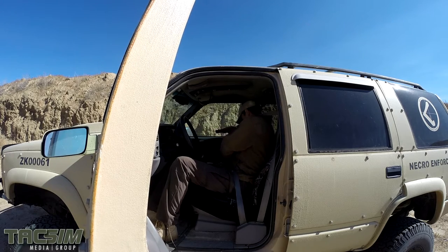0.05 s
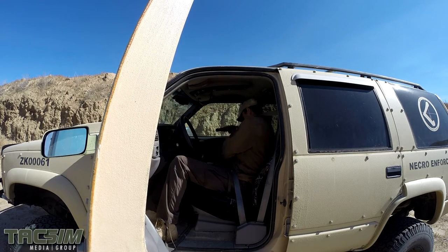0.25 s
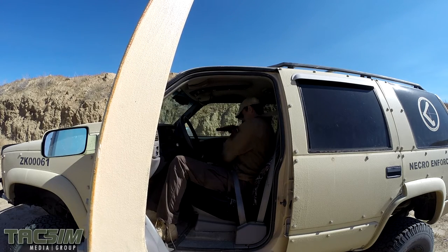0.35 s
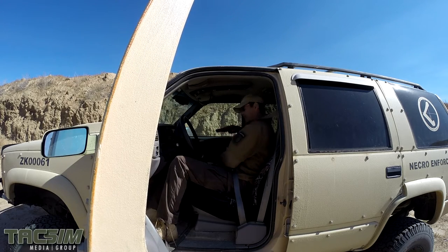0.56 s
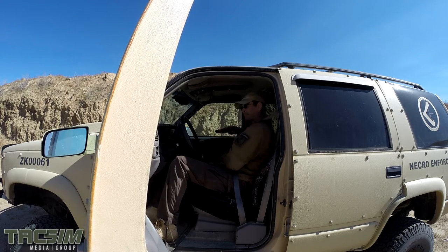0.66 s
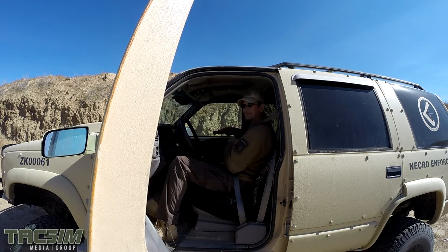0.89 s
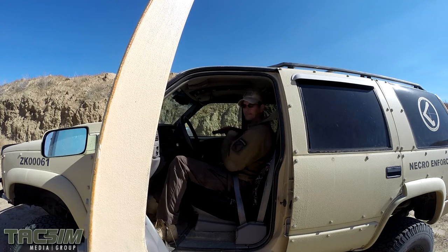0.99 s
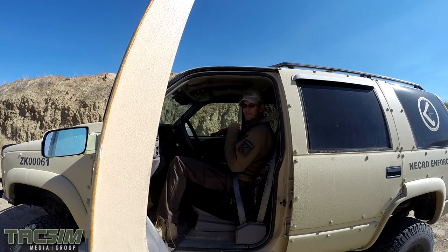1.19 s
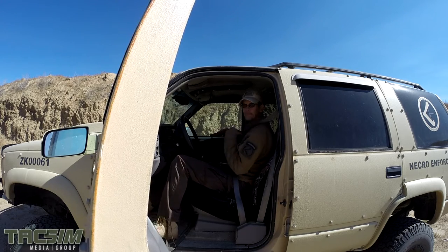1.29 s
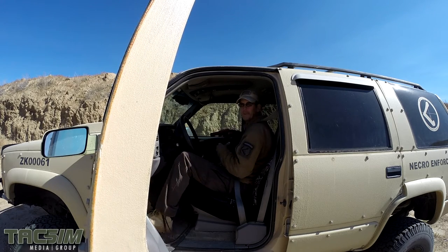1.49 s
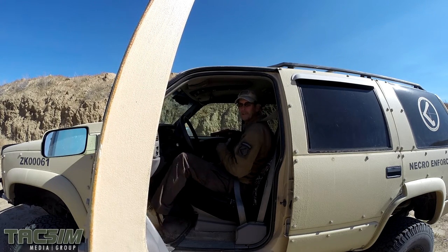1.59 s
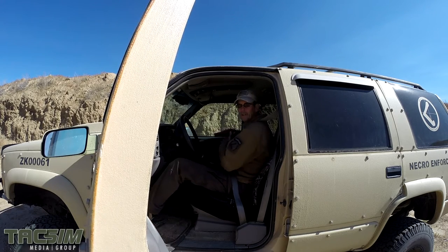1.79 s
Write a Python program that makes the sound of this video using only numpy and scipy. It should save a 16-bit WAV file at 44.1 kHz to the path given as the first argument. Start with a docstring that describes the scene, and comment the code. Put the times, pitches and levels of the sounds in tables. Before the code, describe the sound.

Close seat belt handling: webbing rustles and slides, a latch snaps and the buckle knocks.

```python
"""A seat belt is pulled across a jacket in a parked vehicle with its door open, heard from very close.
From the start, body movement and outdoor air rumble while webbing rustles and zips over cloth by
stick-slip friction and the fittings tap. At 0.27 s the latch snaps and chatters. At 1.08 s the buckle
knocks on the padded chest; the belt then slides through its guide, and at 1.55 s a bump lands almost
on the microphone. A last zip and two light taps follow."""
import sys
import numpy as np
from scipy import signal
from scipy.fft import rfft, irfft
from scipy.io import wavfile
from scipy.ndimage import uniform_filter1d

SR = 44100
rng = np.random.default_rng(int(sys.argv[2]) if len(sys.argv) > 2 else 0)


def int16_out(signal):
    """Quantize to a 16-bit WAV file."""
    q = np.round(np.clip(np.atleast_2d(signal).T, -1, 1) * 32767)
    wavfile.write(sys.argv[1], SR, q.astype(np.int16))


N = 81585
T = np.arange(N) / SR
CONTACT_RISE_S = 0.00065  # onset of the noise burst in taps and latch cracks


def undb(db):
    """Amplitude ratio of a level: a factor of ten for every 20 dB."""
    return 10 ** (np.asarray(db) / 20)


def unit(x):
    """Normalisation to an rms of 1."""
    return x / np.sqrt(np.mean(x ** 2))


def follow(curve):
    """Amplitude envelope, interpolated in decibels between (t/s, level/dB) points."""
    return undb(np.interp(T, *np.array(curve).T))


def colour(x, points):
    """Spectral shaping by (f/Hz, relative level/dB) points; the result has an rms of 1."""
    hz, db = np.array(points).T
    f = np.maximum(np.fft.rfftfreq(N, 1 / SR), 1)
    gain = undb(np.interp(np.log(f), np.log(hz), db))
    return unit(irfft(rfft(x) * gain, N))


def band(hz, width_hz):
    """Random excitation of a resonance: noise of rms 1 in one band with steep skirts."""
    f = np.maximum(np.fft.rfftfreq(N, 1 / SR), 1)
    detune = (f * f - hz * hz) / (f * width_hz)
    return unit(irfft(rfft(rng.standard_normal(N)) / (1 + .5 * detune ** 2), N))


def flutter(rate_hz, spread_db):
    """Random amplitude modulation: a gain whose level follows twice-smoothed noise."""
    window = int(SR / rate_hz)
    drift = uniform_filter1d(uniform_filter1d(rng.standard_normal(N), window), window)
    return undb(spread_db * unit(drift))


def slips(per_s, spread_db):
    """Stick-slip releases as a Poisson train of impulses, a few much larger than the rest."""
    released = rng.random(N) < per_s / SR
    polarity = np.sign(rng.standard_normal(N))
    level_db = spread_db * np.minimum(rng.exponential(1, N), 6)
    return released * polarity * undb(level_db)


def strike(at, rise_s, t60):
    """Envelope of an impact: a rounded rise, then exponential decay by 60 dB in t60 seconds."""
    age = np.maximum(T - at, 0)
    return (1 - np.exp(-(age / rise_s) ** 2)) * np.exp(-np.log(1000) * age / t60)


def ring(at, modes, rise_s):
    """Free vibration after one contact: a superposition of damped modes."""
    return -sum(undb(db) * strike(at, rise_s, t60) * np.sin(2 * np.pi * hz * (T - at))
                for hz, db, t60 in modes)


def rumble():
    """Buffeting: body movement and air make random, low-frequency pressure fluctuations."""
    # spectrum of the buffeting: f/Hz, level/dB
    spectrum = [(10, -15), (25, 2), (45, 2), (80, -2.5), (130, -11.5), (200, -18), (400, -43), (1500, -66)]
    # its envelope: t/s, level/dB
    envelope = [(0, -30.5), (.16, -35), (.21, -26), (.32, -26), (.43, -34), (.49, -28.5), (.64, -30.5),
                (.8, -35.5), (.93, -28.5), (1.04, -19), (1.09, -20.5), (1.14, -31.5), (1.3, -28.5),
                (1.38, -43.5), (1.47, -35), (1.55, -27.5), (1.66, -36), (1.73, -38), (1.85, -42.5)]
    return colour(rng.standard_normal(N), spectrum) * follow(envelope)


def webbing_hiss():
    """Stick-slip friction: fibres catch and release so densely that the impulses merge into a hiss."""
    # spectrum of the fibre releases: f/Hz, level/dB
    spectrum = [(300, -2), (1000, 5.5), (1800, -0.5), (2800, 1.5), (4500, -2.5), (7000, 1), (10500, -1.5),
                (13500, -2.5), (16000, -15)]
    # envelope of the hiss: t/s, level/dB
    envelope = [(0, -58), (.04, -50.5), (.105, -59), (.135, -67), (.16, -48), (.2, -47), (.235, -38.5),
                (.28, -32), (.315, -45.5), (.37, -45.5), (.46, -47), (.49, -50.5), (.58, -49.5),
                (.68, -57.5), (.92, -51.5), (.975, -39), (1.03, -39.5), (1.085, -32.5), (1.11, -42.5),
                (1.17, -48.5), (1.26, -42), (1.3, -46.5), (1.48, -47.5), (1.535, -37.5), (1.548, -50.5),
                (1.57, -38), (1.588, -56.5), (1.85, -53.5)]
    fibres = colour(slips(per_s=14000, spread_db=3), spectrum)
    return fibres * flutter(rate_hz=160, spread_db=1.0) * follow(envelope)


def jacket_rustle():
    """Crumpling: each fold that gives way radiates an impulse, and together they form a low rustle."""
    # spectrum of the folds: f/Hz, level/dB
    spectrum = [(60, -31), (130, -5.5), (220, -1), (450, -4.5), (800, -9), (1300, -14.5), (2200, -17.5),
                (4000, -23), (10000, -46)]
    # envelope of the rustle: t/s, level/dB
    envelope = [(0, -51.5), (.09, -44), (.135, -53), (.19, -47), (.24, -34.5), (.29, -29), (.33, -42.5),
                (.46, -50), (.53, -45), (.7, -49.5), (.82, -46), (.93, -42), (.98, -36.5), (1.03, -26.5),
                (1.08, -31), (1.115, -39.5), (1.145, -38), (1.21, -54.5), (1.26, -43.5), (1.36, -47),
                (1.43, -45.5), (1.462, -34), (1.49, -43.5), (1.53, -36), (1.565, -39.5), (1.6, -49),
                (1.85, -47)]
    folds = colour(slips(per_s=2500, spread_db=2.5), spectrum)
    return folds * flutter(rate_hz=84, spread_db=2.5) * follow(envelope)


def fitting_taps():
    """Heavily damped impacts: each light contact of the fittings gives a decaying band of noise."""
    # taps: t/s, level/dB, centre f/Hz, bandwidth/Hz, t60/s
    contacts = [(0.021, -33, 980, 1190, 0.038), (0.0686, -31, 600, 980, 0.037),
                (.4285, -30, 8000, 7000, .003), (.448, -21, 8000, 7000, 0.0035),
                (0.847, -31, 900, 1190, 0.013), (.918, -33, 1300, 1400, 0.022),
                (1.0145, -18, 900, 2500, .007), (1.173, -30.5, 443, 340, 0.076),
                (1.553, -20, 700, 2510, 0.013), (1.716, -30, 800, 2200, 0.0071),
                (1.8135, -35.5, 850, 700, 0.024)]
    return sum(undb(db) * strike(at, CONTACT_RISE_S, t60) * band(hz, width)
               for at, db, hz, width, t60 in contacts)


def webbing_zips():
    """Friction noise grows with sliding speed: short slips over cloth speed up, run and stop."""
    # quick slips: t/s, rise/s, hold/s, fall/s, level/dB, centre f/Hz, bandwidth/Hz
    pulls = [(0.085, .002, 0.0044, 0.021, -40, 11800, 5000),
             (.511, 0.0026, 0.0075, 0.026, -38.5, 10400, 11000),
             (0.51, 0.0034, 0.014, 0.032, -40.5, 985, 1700), (1.032, 0.019, 0.025, .008, -26, 9000, 10000),
             (1.261, 0.013, 0.0049, 0.0047, -28.5, 6840, 4300),
             (1.361, 0.022, 0.013, 0.015, -43.5, 4800, 2200),
             (1.506, 0.0094, .005, 0.016, -38.5, 1270, 694), (1.68, 0.0044, .002, 0.008, -42, 4230, 900)]
    out = 0
    for at, rise, hold, fall, db, hz, width in pulls:
        speeding_up = np.clip((T - at) / rise, 0, 1)
        slowing = np.clip(1 - (T - at - rise - hold) / fall, 0, 1) ** 2
        out = out + undb(db) * speeding_up * slowing * band(hz, width)
    return out


def latch_snap():
    """Impact excitation: each contact of the chattering latch gives a bright crack and a hollow ring."""
    # contacts of the latch: t/s, crack level/dB, ring level/dB
    contacts = [(0.2706, -4.5, -30), (0.2729, -20, -1.5), (0.2765, -19, -20), (.278, -20.5, -22),
                (0.283, -25, -17.5)]
    # spectrum of the crack: f/Hz, level/dB
    spectrum = [(300, -26), (900, 14.5), (2500, 2), (4500, -1), (7000, -0.5), (12000, -0.5), (16000, -8)]
    # modes of the latch: f/Hz, relative level/dB, t60/s
    modes = [(913, -5.5, .02), (1090, -8, 0.015), (1567, 7.5, .016), (2670, -12.5, 0.022)]
    crack = colour(rng.standard_normal(N), spectrum)
    return sum(undb(crack_db) * crack * strike(at, CONTACT_RISE_S, t60=0.015)
               + undb(ring_db) * ring(at, modes, rise_s=.0017)
               for at, crack_db, ring_db in contacts)


def buckle_knock():
    """Damping: against the padded chest the buckle's modes die within milliseconds, a dead knock."""
    # impact and rebound: t/s, level/dB
    contacts = [(1.0845, 1), (1.0864, -7.5)]
    # modes of the buckle against the body: f/Hz, relative level/dB, t60/s
    modes = [(480, 7.5, .005), (800, 1.5, 0.0041), (1250, -22, 0.0058)]
    return sum(undb(db) * ring(at, modes, rise_s=0.00036) for at, db in contacts)


def guide_slide():
    """Sliding friction: webbing running smoothly through its guide radiates continuous treble noise."""
    # spectrum of the sliding: f/Hz, level/dB
    spectrum = [(800, -22), (2200, -10), (4400, 1.5), (5800, -5.5), (7400, -5), (10000, 3.5), (12500, 5),
                (15500, -2)]
    # its envelope: t/s, level/dB
    envelope = [(1.27, -66), (1.295, -40), (1.34, -41.5), (1.41, -42), (1.45, -35.5), (1.485, -36),
                (1.515, -43.5), (1.541, -40), (1.547, -75)]
    return colour(rng.standard_normal(N), spectrum) * follow(envelope)


def jacket_bump():
    """A soft impact excites low modes: a deep bump by the microphone, whose lowest mode swells late."""
    # soft contact: t/s, level/dB
    contacts = [(1.5527, 1)]
    # modes of the jacket, lowest first: f/Hz, relative level/dB, t60/s
    modes = [(29.2, -2, 0.18), (78.4, -6.5, 0.042), (171, -5.5, 0.017), (340, -9, 0.008)]
    return sum(undb(db) * (ring(at, modes[1:], rise_s=.0007) - ring(at, modes[:1], rise_s=0.013))
               for at, db in contacts)


def scene():
    """Superposition: all sources add at one close microphone, the same on both channels."""
    close = (rumble() + webbing_hiss() + jacket_rustle() + fitting_taps() + webbing_zips()
             + latch_snap() + buckle_knock() + guide_slide() + jacket_bump())
    return np.array([close, close])


def record(dry):
    """Filtering and saturation: the left channel loses bass, peaks clip and the top treble is cut."""
    left_bass_cut_hz, top_hz = 88, 15300
    high_pass = signal.butter(1, left_bass_cut_hz, "high", fs=SR, output="sos")
    low_pass = signal.ellip(10, .2, 80, top_hz, fs=SR, output="sos")
    left = signal.sosfilt(high_pass, dry[0])
    clipped = np.clip([left, dry[1]], -1, 1)
    return signal.sosfilt(low_pass, clipped)


dry = scene()
out = record(dry)
int16_out(out)
```